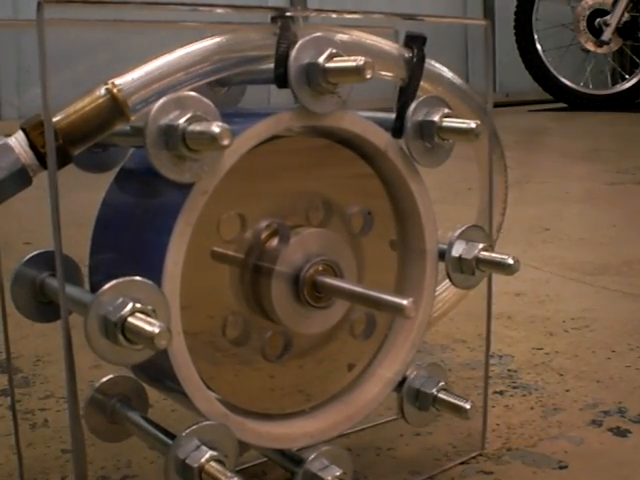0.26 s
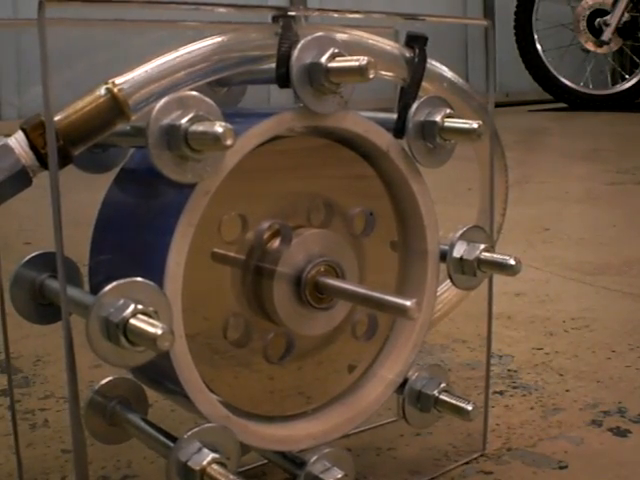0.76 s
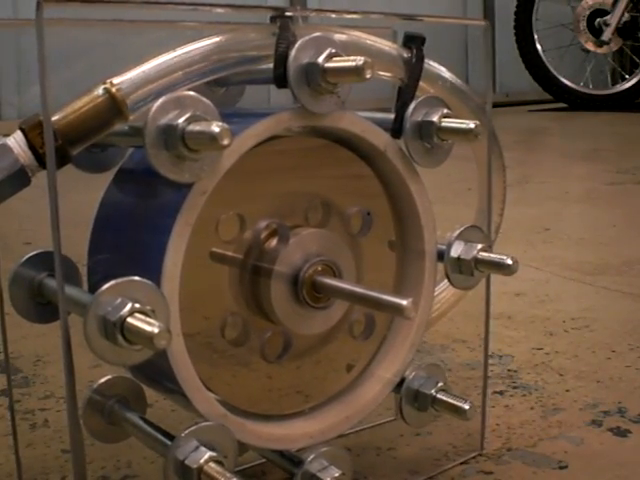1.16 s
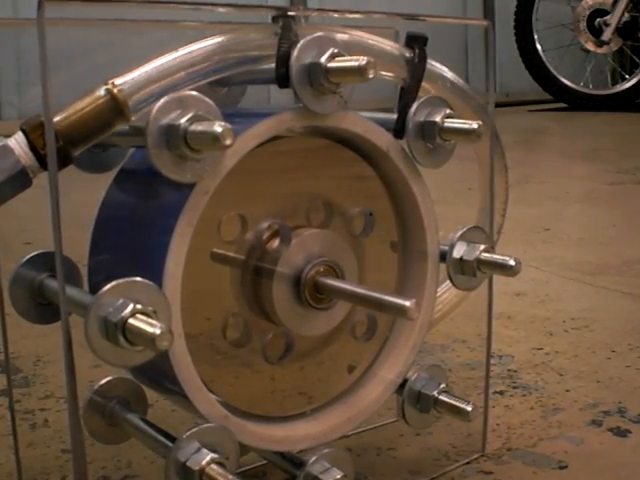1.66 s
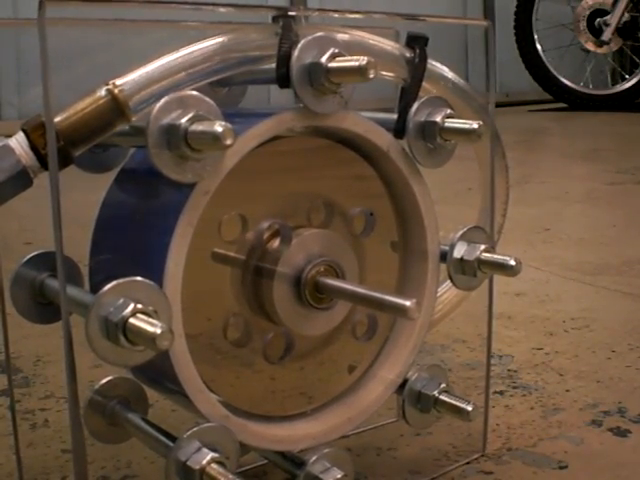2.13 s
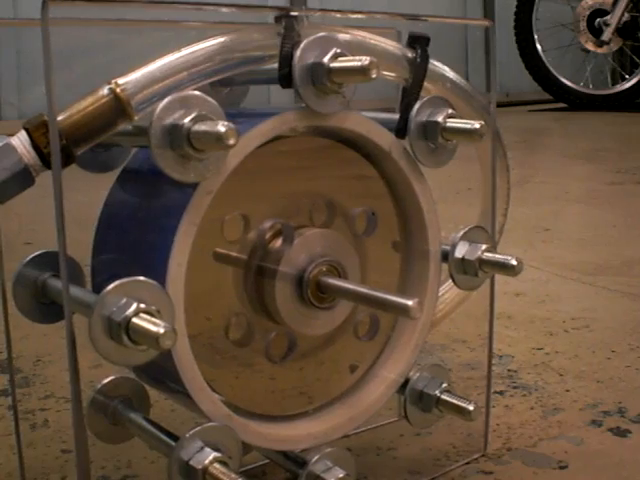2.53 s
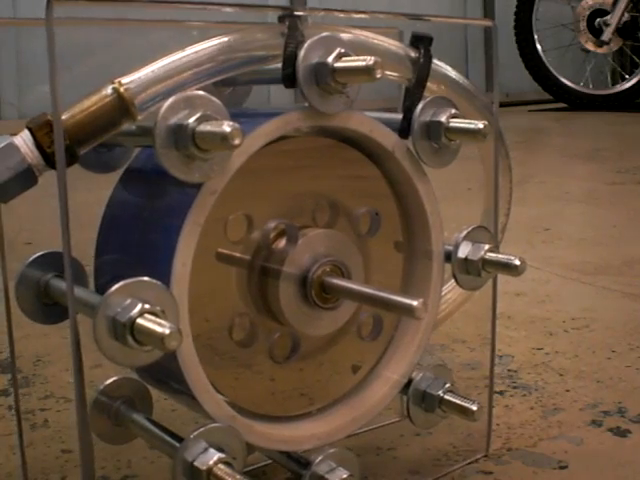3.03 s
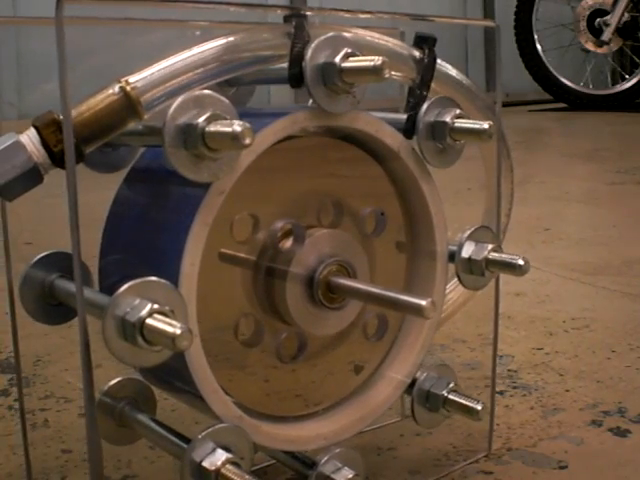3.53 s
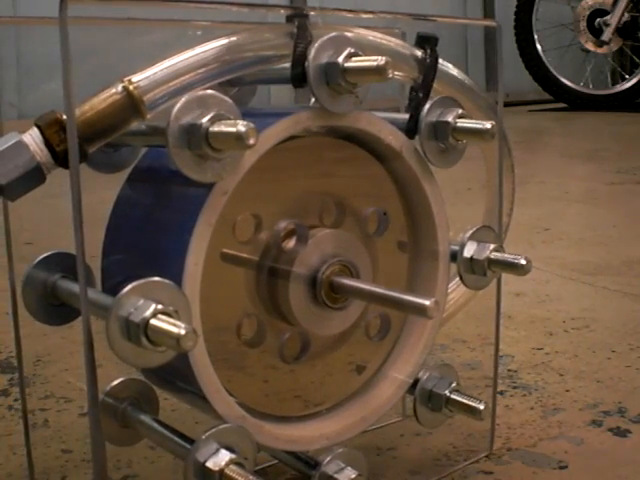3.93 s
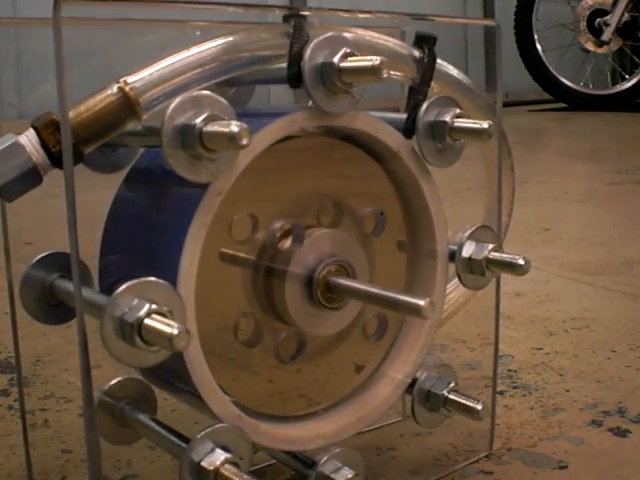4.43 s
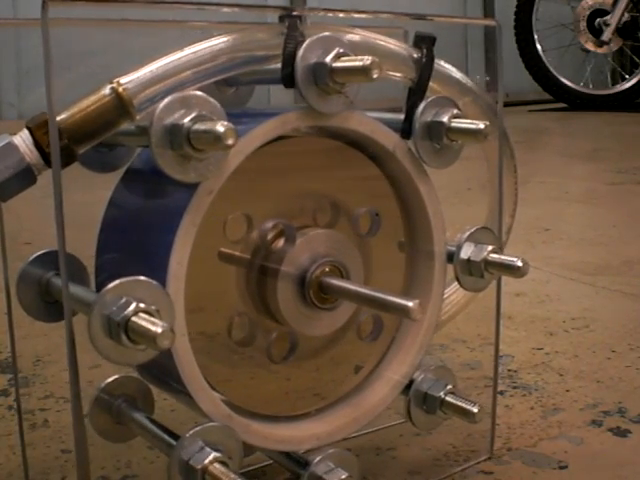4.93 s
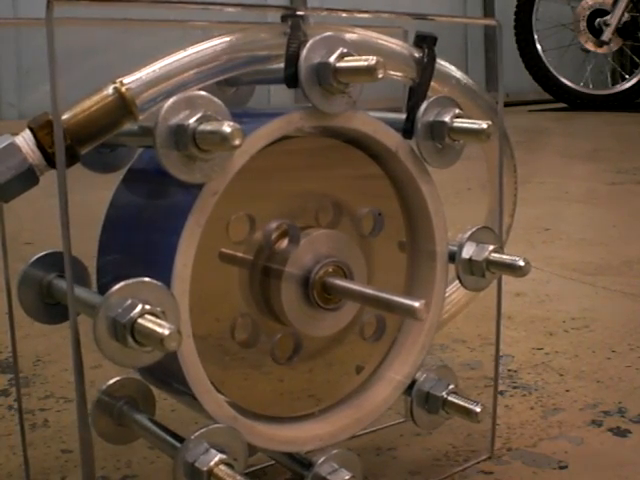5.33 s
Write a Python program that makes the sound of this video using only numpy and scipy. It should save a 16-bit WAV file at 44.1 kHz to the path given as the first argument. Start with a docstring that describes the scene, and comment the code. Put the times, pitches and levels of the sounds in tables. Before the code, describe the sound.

Compressed air rushes through a small turbine with a thin rising whine, cuts off, and leaves the bearings humming as it slowly coasts.

```python
"""Small air turbine, run and coast.

A compressed-air jet hisses and roars in the casing while eight rotor ports chop the exhaust into a
rising whine. The valve shuts with brief whistles and the swirl sinks away. The rotor coasts and slows,
its ball bearings rumbling through the casing modes. One close mono microphone."""
import sys
import numpy as np
from scipy import signal
from scipy.fft import rfft, irfft, next_fast_len
from scipy.io import wavfile

SR = 44100
rng = np.random.default_rng(int(sys.argv[2]) if len(sys.argv) > 2 else 0)


def store_wav(level_fs):
    """Save 16-bit WAV to argv[1]."""
    pcm = np.round(np.clip(np.atleast_2d(level_fs), -1, 1) * 32767)
    wavfile.write(sys.argv[1], SR, pcm.T.astype(np.int16))


N = 246514
SHUT_START_S, SHUT_TAKES_S = 3.21, .38
ROAR_ON_S, ROAR_OFF_S, ROAR_SWITCH_S = 1.16, 2.8, .0726
SWELL_START_S = 3.374


def from_db(db):
    """Decibels to gain."""
    return 10 ** (np.asarray(db) / 20)


def unit_rms(x):
    """Scale to rms 1."""
    return x / np.sqrt(np.mean(np.abs(x) ** 2) + 1e-20)


def since(start_s):
    """Seconds since start_s, 0 before."""
    return np.maximum(np.arange(N) / SR - start_s, 0)


def ramp(start_s, takes_s):
    """Linear rise from 0 to 1."""
    return np.minimum(since(start_s) / takes_s, 1)


def bump(centre_s, length_s):
    """Gaussian envelope, peak 1."""
    return np.exp(-(2 * (since(0) - centre_s) / length_s) ** 2)


def curve(rows):
    """Breakpoints interpolated per sample."""
    return np.interp(since(0), *np.transpose(rows))


def drift(rate_hz):
    """Slow random wander, rms 1."""
    hop, warmup = 40, 2000
    pole = np.exp(-2 * np.pi * hop * rate_hz / SR)
    noise = rng.standard_normal(N // hop + warmup + 2)
    slow = signal.lfilter([1], [1, -2 * pole, pole * pole], noise)[warmup:]
    return np.interp(np.arange(N) / hop, np.arange(len(slow)), unit_rms(slow))


def coloured(x, spectrum, modes):
    """Filter by a broad spectrum plus resonances and dips; rms 1."""
    size = next_fast_len(N)
    hz = np.maximum(np.arange(size // 2 + 1) * SR / size, 1)
    knots_hz, knots_db = np.transpose(spectrum)
    shape_db = np.interp(np.log(hz), np.log(knots_hz), knots_db)
    for centre_hz, width_hz, lift_db in modes:
        shape_db += lift_db / (1 + (2 * (hz - centre_hz) / width_hz) ** 2)
    return unit_rms(irfft(rfft(x, size) * from_db(shape_db), size)[:N])


def tone(cycles):
    """Sine following a running cycle count; rms 1."""
    return np.sqrt(2) * np.sin(2 * np.pi * (cycles + rng.random()))


def noise_band(centre_hz, width_hz):
    """Narrow noise around a steady or moving pitch; rms 1."""
    pole = np.exp(-np.pi * width_hz / SR)
    noise = rng.standard_normal(N) + 1j * rng.standard_normal(N)
    slow = signal.lfilter([1], [1, -2 * pole, pole * pole], noise)
    cycles = np.cumsum(np.broadcast_to(centre_hz, N)) / SR
    return unit_rms((slow * np.exp(2j * np.pi * cycles)).real)


def pressure():
    """Supply pressure: 1 with the valve open, 0 shut."""
    return 1 - ramp(SHUT_START_S, SHUT_TAKES_S)


def rough_flow():
    """1 while the flow is rough, 0 while calm."""
    return ramp(ROAR_ON_S, ROAR_SWITCH_S) - ramp(ROAR_OFF_S, ROAR_SWITCH_S)


def swell_db(depth_db=12.5, takes_s=.87):
    """Rise from -depth_db to 0 in the sound after the valve shuts."""
    return depth_db * (ramp(SWELL_START_S, takes_s) - 1)


# Valve whistles: centre_s, length_s, pitch_hz, level_db
WHISTLES = [(3.34, .12, 7800, -38), (3.37, .14, 12300, -36), (3.4, .2, 15450, -36),
            (3.42, 0.21, 6100, -36.5), (3.43, 0.19, 3100, -37.5), (3.45, 0.14, 10050, -38.5),
            (3.497, 0.15, 4100, -37), (3.51, .12, 12550, -41)]


def whistles():
    """Each narrowing gap in the valve sings one brief, breathy pitch."""
    return sum(from_db(db) * bump(centre_s, length_s) * noise_band(hz, width_hz=170)
               for centre_s, length_s, hz, db in WHISTLES)


# Valve air spectrum: freq_hz, density_db
VALVE_SPECTRUM = [(1500, -13), (3000, -1), (6000, 2), (10000, -12), (12500, -8), (15800, 0)]
# Valve resonances and dips: centre_hz, width_hz, lift_db
VALVE_MODES = [(5100, 150, 6), (5600, 150, 5), (7000, 150, 6), (7500, 200, -4), (8800, 200, 3),
               (10600, 500, -4)]


def valve_puff(start_s=3.125, attack_s=.1, hold_s=.18, fade_db_per_s=67):
    """The last air rushes through the closing valve."""
    level_db = -26.5 - fade_db_per_s * since(start_s + attack_s + hold_s)
    rush = coloured(rng.standard_normal(N), VALVE_SPECTRUM, VALVE_MODES)
    return rush * from_db(level_db) * ramp(start_s, attack_s)


def swirl(sunk_hz=627, creep_hz_per_s=12, width_hz=70, lower_ratio=.705, fade_db_per_s=80):
    """The vortex sings two wide tones that jump with the roar and sink with the pressure."""
    air = pressure()
    open_hz = 979 + 50.14 * ramp(ROAR_ON_S, ROAR_SWITCH_S) + creep_hz_per_s * since(0)
    pitch_hz = sunk_hz + (open_hz - sunk_hz) * air
    upper_db = -36 + 4.5 * rough_flow() + 5 * (1 - air) - fade_db_per_s * since(3.6)
    upper = from_db(upper_db) * noise_band(pitch_hz, 1.8 * width_hz)
    lower = from_db(upper_db - 6) * air ** 2 * noise_band(lower_ratio * pitch_hz, width_hz)
    return upper + lower


# Brief dips in bearing level: centre_s, length_s, depth_db
BEARING_DIPS = [(4.683, .12, 1.5), (5.387, .06, 0.5)]


def bearing_db(under_jet_db=-7.5):
    """Heard bearing level, quieter while the jet blows, swelling afterwards."""
    dips_db = sum(db * bump(centre_s, length_s) for centre_s, length_s, db in BEARING_DIPS)
    return swell_db() + under_jet_db * pressure() ** 2 - dips_db


# Bearing noise spectrum: freq_hz, density_db
RUMBLE_SPECTRUM = [(15, -62), (40, -36), (120, -33), (250, -23), (400, -12.5), (600, -7.5), (900, -7),
                   (1200, -6.5), (1550, -9.5), (2100, -5.5), (2700, -10.5), (4000, -18), (6000, -24.5),
                   (10000, -25), (15800, -25.5)]
# Casing resonances and dips: centre_hz, width_hz, lift_db
CASING_MODES = [(250, 40, -6), (310, 30, 6), (516, 40, 7), (576, 35, 10), (670, 30, 4), (890, 120, -5),
                (1030, 40, 6), (1140, 45, 9), (1265, 40, 4), (1385, 50, 3), (1630, 35, 6), (1815, 60, 4),
                (1990, 50, 4), (2145, 80, 4), (2310, 50, 7), (4150, 100, 3), (5050, 300, 2), (5650, 250, 3),
                (8400, 500, 4), (10700, 600, -2), (14300, 600, -3)]
# Race hiss bands: shaft_order, width_hz, relative_db
RACE_BANDS = [(49.5, 350, -31), (56.3, 350, -27), (60.5, 300, -32), (66.5, 500, -29)]


def bearing_noise(speed_hz, turns):
    """Rumble pulses once a turn through the casing; rough races hiss in bands tied to shaft speed."""
    pulsing = 1 + .078 * np.cos(2 * np.pi * turns)
    shaking = rng.standard_normal(N) * pulsing * from_db(.94 * drift(35))
    rumble = coloured(shaking, RUMBLE_SPECTRUM, CASING_MODES)
    hiss = sum(from_db(db) * noise_band(order * speed_hz, width_hz)
               for order, width_hz, db in RACE_BANDS)
    return from_db(-17.5 + bearing_db()) * (rumble + hiss)


# Ball-pass tones and shaft sidebands: shaft_order, relative_db
BALL_TONES = [(.5, -44), (1.5, -32), (2.67, -22), (3.115, -20.5), (4.115, -24.5), (5.115, -18),
              (6.115, -22), (6.23, -22), (6.61, -24), (7.23, -26.5), (8.115, -25.5), (9.35, -15),
              (9.73, -25)]


def bearing_tones(turns, swell_share=.59, wobble_db=2.5, ring_hz=2145, boom_hz=165):
    """Passing balls sound wavering tones; two casing modes come up as the air goes."""
    coasting = 1 - pressure()
    tones_db = bearing_db() - (1 - swell_share) * swell_db() * coasting
    balls = sum(from_db(-15.5 + tones_db + db + wobble_db * drift(4.4)) * tone(order * turns)
                for order, db in BALL_TONES)
    ring = from_db(-26 + tones_db + 1.6 * drift(3)) * noise_band(ring_hz, width_hz=45)
    boom = from_db(-51 + bearing_db() + 2.2 * drift(3)) * noise_band(boom_hz, width_hz=25)
    return balls + coasting * (ring + boom)


def shaft_tone(turns):
    """One cycle per turn, swelling slowly during the coast."""
    level_db = -38.5 + swell_db(depth_db=11.5, takes_s=1.4) + 2.15 * drift(4.1)
    return from_db(level_db) * tone(turns + .086 * drift(13))


def coasting_hum(turns, order=3.665, sharp_hz=25.14, settle_s=.2):
    """The coasting rotor hums at a multiple of shaft speed, slightly sharp at first."""
    offset_hz = sharp_hz * np.exp(-since(SHUT_START_S + SHUT_TAKES_S) / settle_s)
    hum = tone(order * turns + np.cumsum(offset_hz) / SR + .041 * drift(4.3))
    return (1 - pressure()) ** 2 * from_db(-28 + swell_db() + .99 * drift(12)) * hum


# Roar spectrum: freq_hz, density_db
ROAR_SPECTRUM = [(300, -28), (600, -15), (1300, -6), (2000, -4.5), (2600, -0.5), (3000, 1), (3500, -7),
                 (4200, -6), (7000, -11), (9000, -24)]
# Roar resonances: centre_hz, width_hz, lift_db
ROAR_MODES = [(2600, 90, 4), (2940, 150, 4), (3450, 150, 2)]


def jet_roar(calm_db=-34, lift_db=10.5, burst_db=7, burst_s=.09):
    """Rough flow roars in the casing, with a burst as it sets in."""
    rough_db = lift_db + burst_db * np.exp(-since(ROAR_ON_S) / burst_s)
    roar = coloured(rng.standard_normal(N), ROAR_SPECTRUM, ROAR_MODES)
    return roar * from_db(calm_db + rough_flow() * rough_db + .8 * drift(32)) * pressure()


# Sizzle bands: centre_hz, width_hz, relative_db
SIZZLE_BANDS = [(9700, 900, -3), (10850, 700, -3), (11850, 450, -3), (12500, 600, -1), (13800, 600, 0)]


def jet_sizzle(duck_db=6):
    """The jet's treble sizzle, weaker during the roar."""
    bands = sum(from_db(db) * noise_band(hz, width_hz) for hz, width_hz, db in SIZZLE_BANDS)
    return bands * from_db(-28.5 - duck_db * rough_flow()) * pressure() ** 4.85


# Jet spectrum: freq_hz, density_db
JET_SPECTRUM = [(15, -32), (30, -21.5), (80, -24), (200, -23), (400, -20), (700, -13.5), (1300, -11.5),
                (2200, -10), (3200, -9), (4200, -13), (5500, -13), (7000, -12.5), (8500, -11),
                (10000, -10.5), (12500, -8), (14000, -7), (15800, -5.5)]
# Nozzle and casing resonances and dips: centre_hz, width_hz, lift_db
JET_MODES = [(1800, 100, 3), (2200, 150, 3), (5050, 200, 4), (5600, 220, 4), (6080, 220, 4),
             (6850, 250, -4), (7400, 250, -3), (7830, 200, 6), (8750, 600, 6), (9250, 150, -3),
             (9650, 150, -3), (10850, 500, 1), (11280, 300, -6), (12500, 550, 4), (13150, 500, -3),
             (14250, 600, 3), (14750, 200, -3), (15400, 200, -3)]


def jet_hiss():
    """Compressed air leaves the nozzle with a bright hiss."""
    hiss = coloured(rng.standard_normal(N), JET_SPECTRUM, JET_MODES)
    return hiss * from_db(-14.5 + .68 * drift(27)) * pressure() ** 1.7


# Port tone envelope: time_s, level_db
WHINE_LEVEL = [(0, -27.5), (.4, -23), (.7, -23.5), (1.05, -20), (1.9, -22.5), (2.75, -22.5), (2.88, -28.5),
               (3.2, -28.5), (3.23, -46), (3.29, -44), (3.33, -30), (3.5, -38.5), (3.7, -41), (4, -57),
               (4.6, -38), (5, -30), (5.59, -56)]
# Harmonics of uneven ports: shaft_order, relative_db
UNEVEN_ORDERS = [(9, -35), (11, -31), (17, -16)]


def port_whine(turns, ports=8, growth_db_per_s=2):
    """Rotor ports chop the exhaust into a tone; its octave grows until the roar knocks it down."""
    port_db = curve(WHINE_LEVEL)
    growth_db = growth_db_per_s * np.minimum(since(0), ROAR_ON_S)
    octave_db = -31 + growth_db - 4 * ramp(ROAR_ON_S, ROAR_SWITCH_S)
    whine = from_db(port_db + .8 * drift(20)) * tone(ports * turns)
    octave = from_db(octave_db + .4 * drift(20)) * pressure() ** 5 * tone(2 * ports * turns)
    uneven = sum(from_db(port_db + db) * tone(order * turns) for order, db in UNEVEN_ORDERS)
    return whine + octave + uneven


# Shaft speed: time_s, speed_hz
SHAFT_SPEED = [(0, 200.6), (.4, 202), (1.1, 204.6), (2, 210.5), (2.6, 214.1), (3.25, 216.8), (3.6, 214.2),
               (4.6, 203.6), (5.59, 193.8)]


def scene():
    """Air and rotor sounds, the same in both channels."""
    speed_hz = curve(SHAFT_SPEED)
    turns = np.cumsum(speed_hz) / SR
    air = jet_hiss() + jet_roar() + jet_sizzle() + valve_puff() + whistles() + swirl()
    whine = port_whine(turns)
    bearings = bearing_noise(speed_hz, turns) + bearing_tones(turns)
    mono = air + whine + bearings + shaft_tone(turns) + coasting_hum(turns)
    return np.array([mono, mono])


def record(dry):
    """Narrow notch near 8 kHz, soft clipping, steep low-pass."""
    notch_hz, notch_width_hz, cutoff_hz = 8010, 130, 15760
    notch_band = signal.lfilter(*signal.iirpeak(notch_hz, notch_hz / notch_width_hz, fs=SR), dry)
    dipped = dry - .85 * notch_band
    rounded = .8 * np.tanh(dipped / .8)
    return signal.sosfilt(signal.ellip(16, .3, 80, cutoff_hz, fs=SR, output="sos"), rounded)


dry = scene()
out = record(dry)
store_wav(out)
```